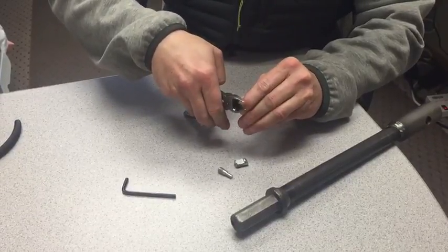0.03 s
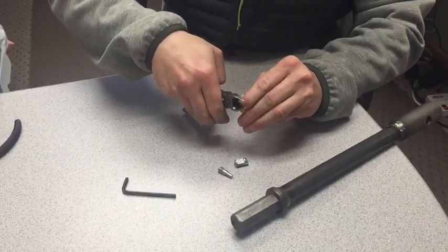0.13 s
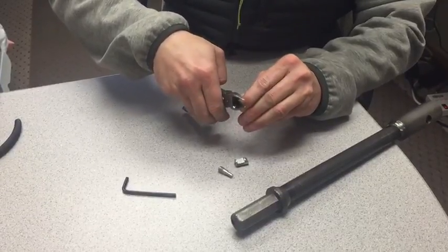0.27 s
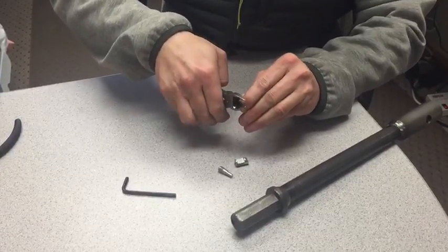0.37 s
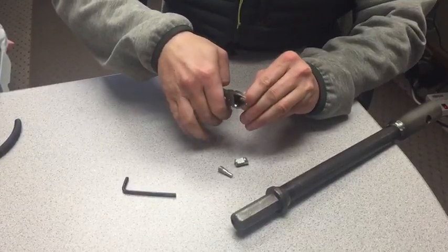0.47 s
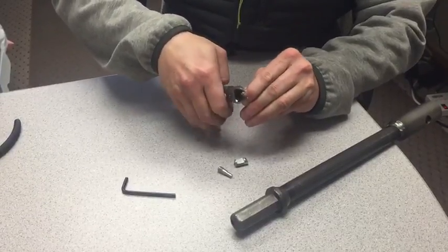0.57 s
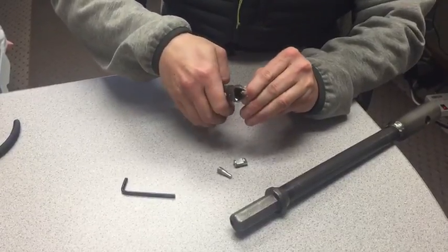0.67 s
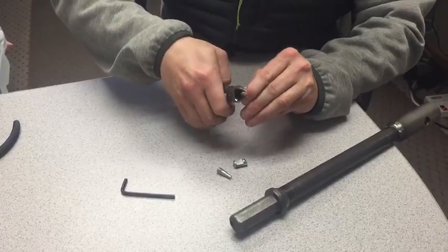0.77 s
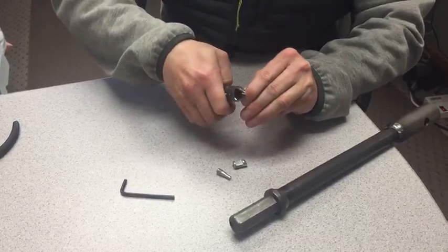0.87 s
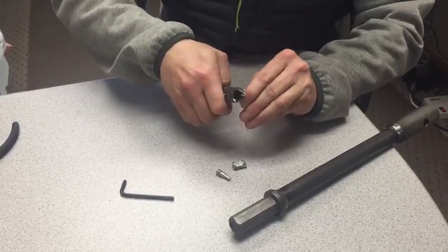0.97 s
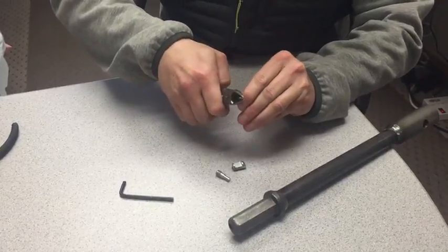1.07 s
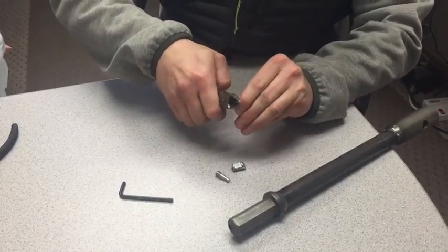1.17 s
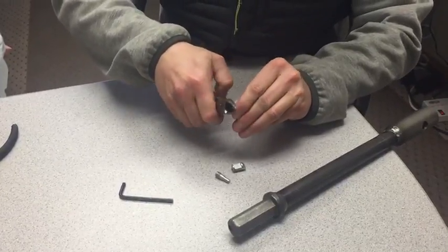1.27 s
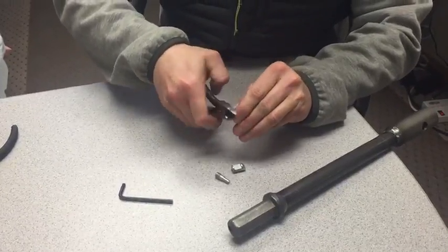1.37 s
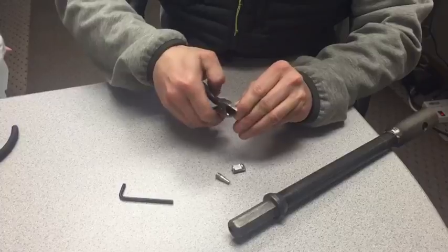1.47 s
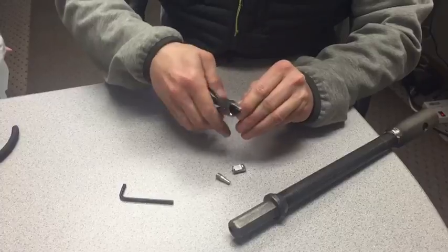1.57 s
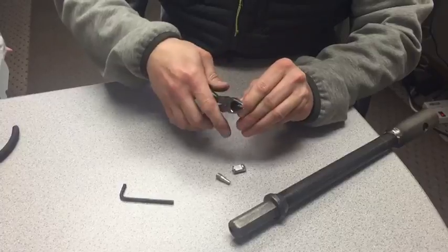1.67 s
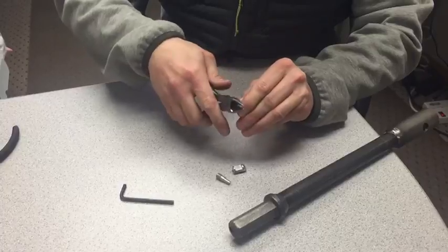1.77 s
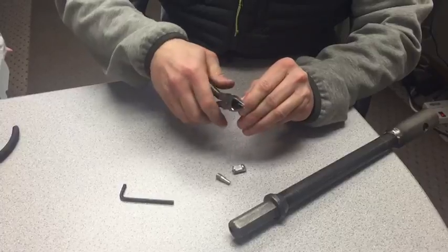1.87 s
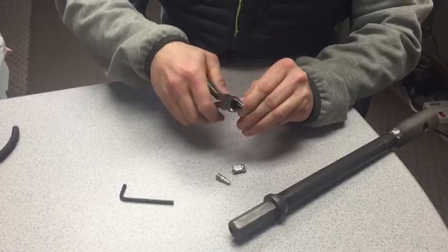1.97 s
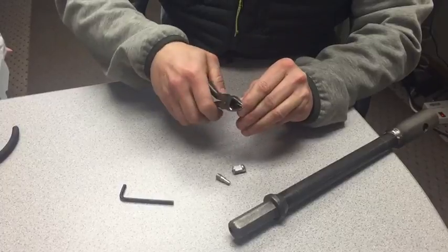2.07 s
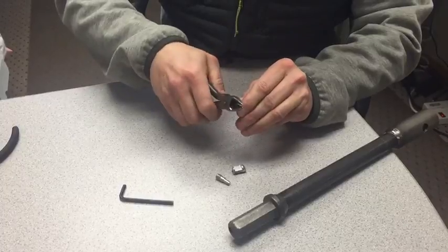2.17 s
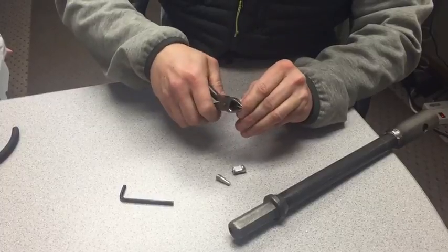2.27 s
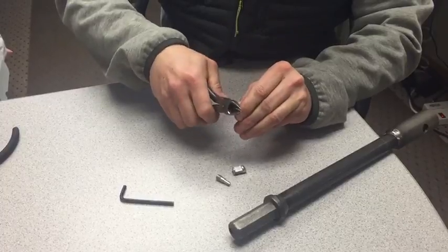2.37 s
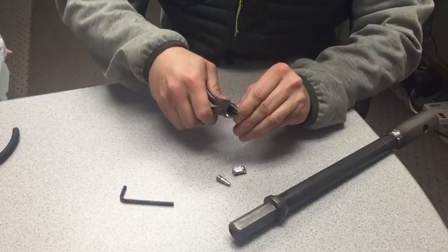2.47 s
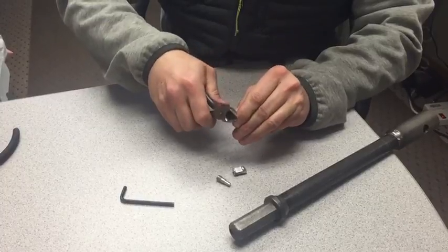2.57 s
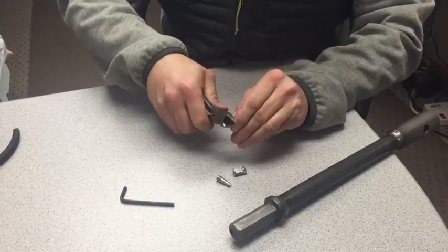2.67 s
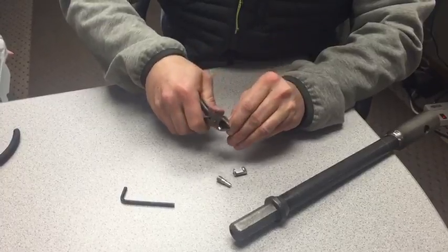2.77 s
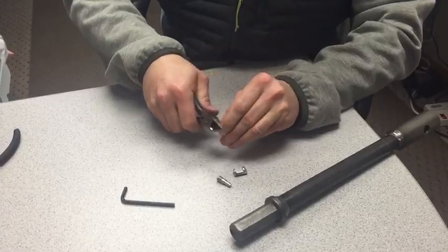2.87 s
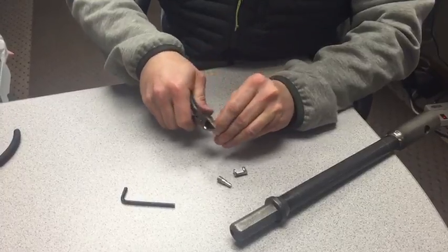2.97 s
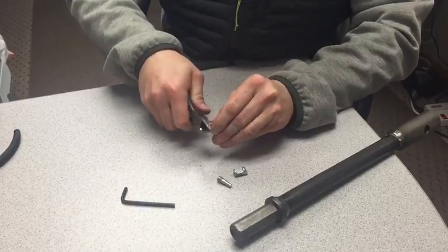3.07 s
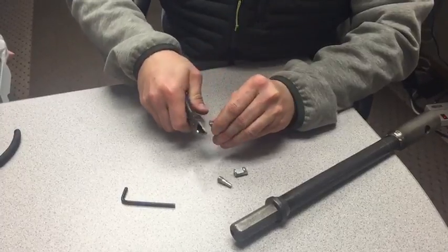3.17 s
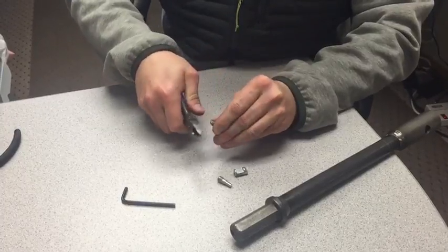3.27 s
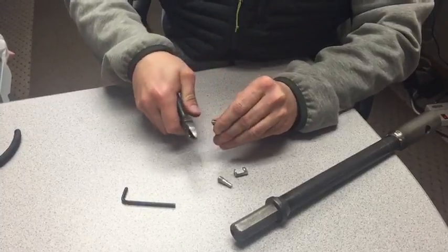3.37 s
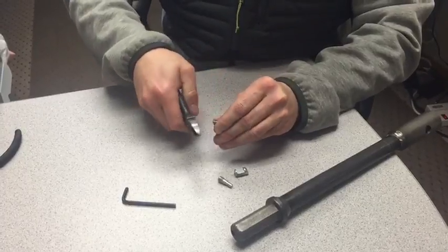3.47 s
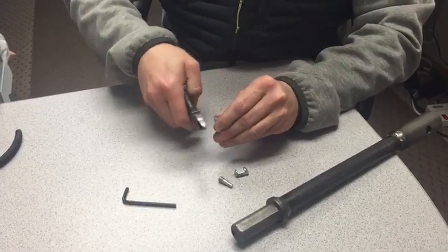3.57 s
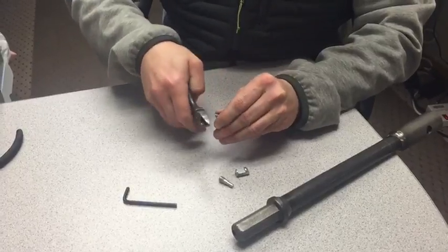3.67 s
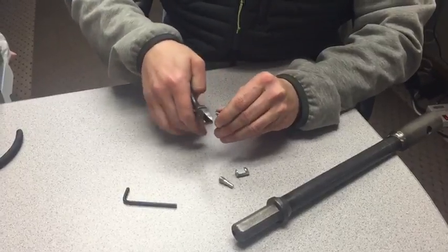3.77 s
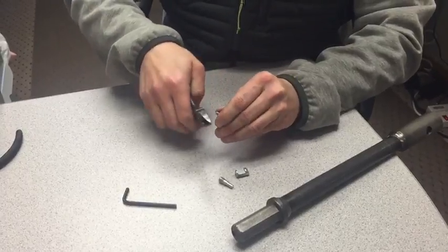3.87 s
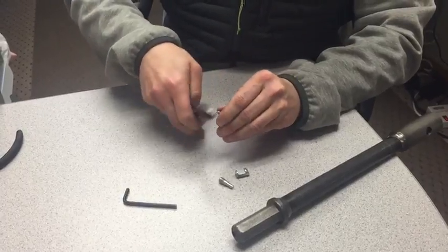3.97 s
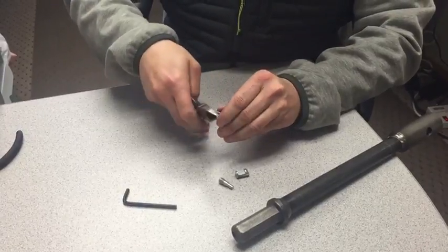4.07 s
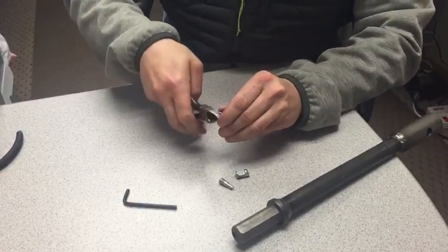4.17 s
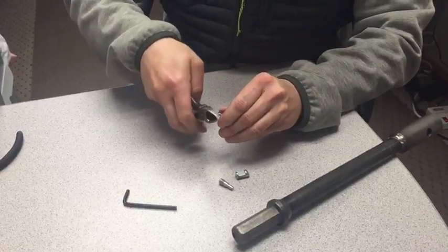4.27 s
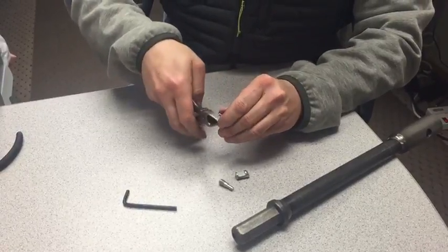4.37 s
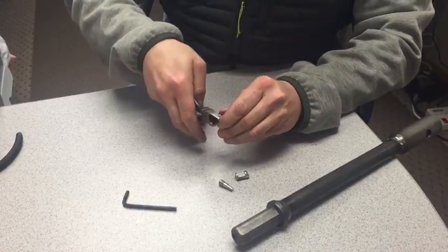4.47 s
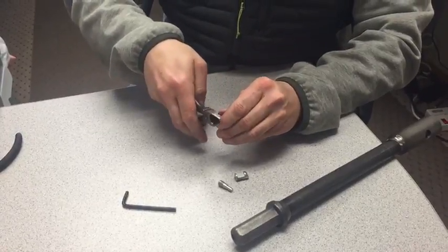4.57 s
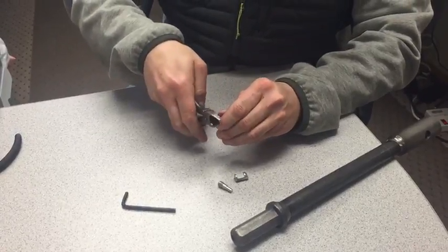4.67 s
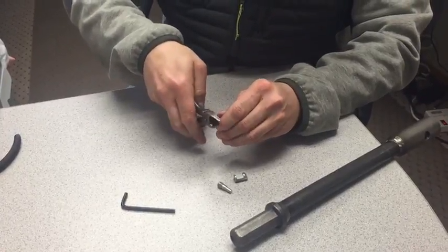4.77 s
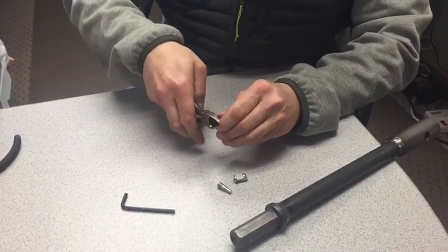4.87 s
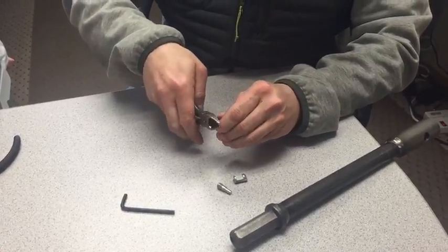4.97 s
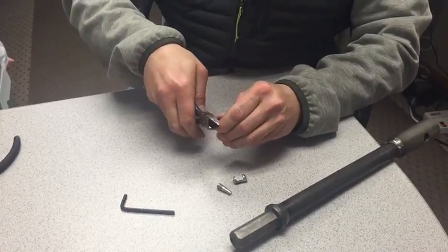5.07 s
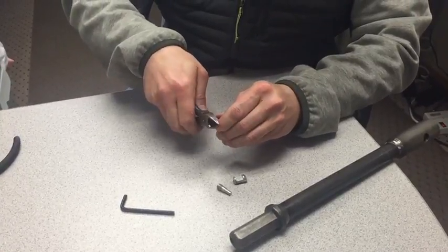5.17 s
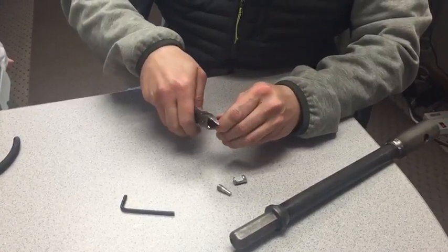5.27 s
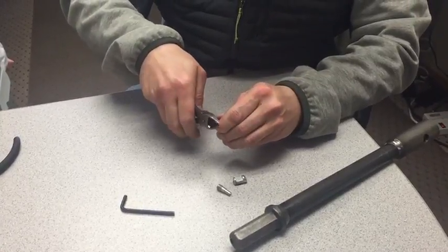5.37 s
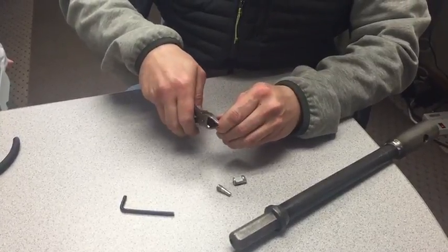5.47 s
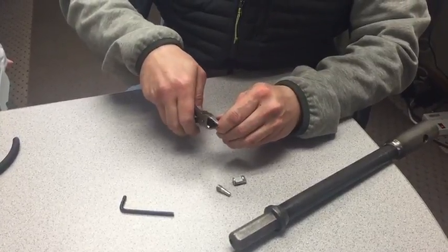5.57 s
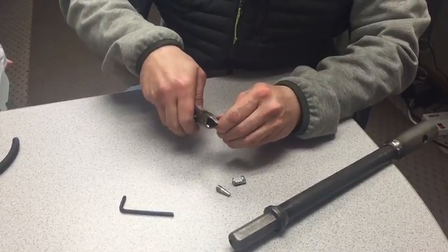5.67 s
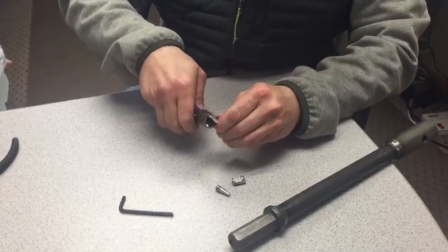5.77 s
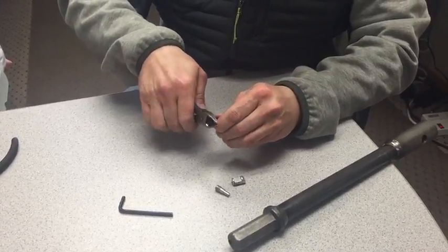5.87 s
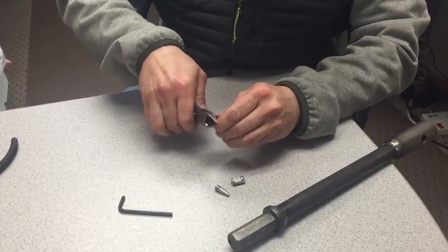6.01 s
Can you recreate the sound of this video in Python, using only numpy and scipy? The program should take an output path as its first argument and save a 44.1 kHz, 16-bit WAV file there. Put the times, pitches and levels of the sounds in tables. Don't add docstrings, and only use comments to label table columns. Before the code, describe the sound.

Close view of a table in a small quiet room with a low ventilation rumble. Cutter handles knock once and the pivot creaks briefly. After a pause, a very loud, bright steel snap jolts the table, and the cut end skips in a far corner. The spring rasps and ticks amid faint sleeve rustle, then the empty jaws clack shut, followed by faint touches and a tap.

```python
import sys
import numpy as np
from scipy import signal
from scipy.fft import rfft, irfft, next_fast_len
from scipy.io import wavfile
from scipy.ndimage import map_coordinates

SR = 44100
rng = np.random.default_rng(int(sys.argv[2]) if len(sys.argv) > 2 else 0)


def ratio_of_db(decibels):
    return 10 ** (np.asarray(decibels, float) / 20)


def to_wav(s):
    ch = np.atleast_2d(s).T
    pcm = np.round(np.clip(ch, -1, 1) * 32767)
    wavfile.write(sys.argv[1], SR, pcm.astype(np.int16))


N = 266408
TAIL = 2 ** 14

# pitch_hz, width_hz, level_db
AIR_MODES = [(51, 11, 2.5), (90.7, 22, -2.5), (109, 27, -6.5), (144, 12, -7), (164.9, 12, 0),
             (195.5, 12, 1)]
# pitch_hz, density_db_per_hz
HISS_COLOUR = [(200, -5.5), (300, -6), (450, -14), (800, -16.5), (4700, -27), (9600, -31.5), (15600, -35),
               (16200, -46)]
# pitch_hz, level_db (rms)
MOTOR_LINES = [(290.7, -88), (387.6, -77), (484.5, -87), (538.3, -91)]

# delay_s, level_db
WALL_ECHOES = [(.0035, -7.5), (.008, -24), (0.0113, -10), (0.015, -16), (.023, -21)]
# pitch_hz, t60_s
ROOM_DECAY = [(150, .2), (600, 0.58), (2000, 0.215), (5000, 0.12), (9000, 0.12), (15000, .125)]

# start_s, peak_db, length_ms
HANDLE_KNOCKS = [
    (.5803, -20, 2.4),
]
PIVOT_SLIPS = [
    (.610, -42, 10),
    (.697, -54, 18),
    (.728, -58, 30),
]
SKIN_GRAZES = [
    (.9188, -58, 2),
    (1.525, -66, 45),
    (4.0765, -52, .8),
    (4.2636, -59, .8),
    (4.2935, -61, .8),
    (4.4346, -60, .8),
    (4.4396, -60, .8),
    (4.4686, -61, .8),
    (4.5154, -62, 1),
]
WIRE_SNAP = [
    (2.9288, -46, 1.9),
    (2.9365, -52, 1.8),
    (2.9405, -50, 1.5),
    (2.9516, 1.2, 1.7),
    (2.9597, -10, 2.6),
    (2.9685, -18, 1.05),
    (2.9715, -17, .8),
]
SLEEVE_RUSTLES = [
    (3.86, -61, 18),
    (4.0768, -52, 1.8),
    (4.12, -64, 34),
    (4.19, -66, 50),
    (4.263, -55, 4),
]
SPRING_TICKS = [
    (4.0017, -33, 1.54),
    (4.012, -36, 1.06),
    (4.0185, -43, 1.5),
]
WIRE_GRAZES = [
    (4.294, -62, .93),
    (4.322, -56.5, .94),
]
JAW_SHUTS = [
    (4.5392, -20, 1.15),
    (4.5465, -40, 1.8),
    (4.5565, -36, 1.8),
    (4.568, -54, 26),
]
RIVET_TAPS = [
    (4.785, -67, 2.7),
    (6.0365, -52, 1.05),
]
HELD_TOUCHES = [
    (5.2228, -40, 1.05),
    (5.231, -50, 1.05),
]
# start_s, peak_db
TABLE_JOLTS = [
    (.582, -47.5),
    (2.9520, -15),
]

# start_s, level_db, length_ms, first_gap_ms, gap_growth, loss_db, length_growth
PIVOT_CREAK = (.638, -51, 8, 6.8, .97, -1.6, .88)
END_LANDING = (3.0812, -28.5, 5, 8, 1.42, 5.3, 1.45)
SPRING_RASP = (3.8065, -45, 2.6, 7.5, 1.12, 2.1, 1.3)

# pitch_hz, width_hz, level_db
HANDLE_MODES = [(340, 83, -20), (650, 80, -5.5), (767, 120, -7), (1040, 120, -10), (1750, 60, -12),
                (2110, 130, 4), (2780, 240, 6), (3160, 250, -8), (4330, 200, 5.5), (5000, 220, -1),
                (5800, 240, -16), (6440, 100, -30), (8300, 1300, -30), (11700, 2500, -45)]
TABLE_MODES = [(71, 47, -0.5), (146.94, 70, 0.5), (260, 127.2, -4.5), (480, 110, -4.5), (728, 250.6, -10)]
JOINT_MODES = [(660, 140, 9), (1010, 220, 3.5), (2090, 110, 8.5), (2700, 240, 2.5), (3100, 400, -4),
               (4550, 320, -2.5), (5830, 660, -14)]
SKIN_MODES = [(700, 600, -9), (2490, 1200, 1), (4150, 410, 3), (5900, 920, -5), (7300, 940, -6)]
BLADE_MODES = [(1350, 500, -23), (1700, 80, -8), (1825, 70, -5), (1950, 90, -1), (2526, 260, -12),
               (3250, 500, -11), (4560, 220, -4), (5800, 700, -10), (7300, 600, -6.5), (8250, 700, -.5),
               (9300, 700, -2), (11100, 600, -7.5), (13200, 1600, -8.5), (15400, 500, -15)]
CORNER_MODES = [(1260, 536, -8.5), (1840, 430, -3), (2450, 290, 4.5), (3200, 740, -1.5), (5495, 1700, -2.5),
                (8380, 3550, -5.5), (14000, 4000, -10.5)]
RUBBED_COIL_MODES = [(2700, 790, -11), (4330, 620, 5), (6000, 670, -11), (6900, 960, 13), (8050, 540, -14),
                     (10500, 1700, -0.5), (13500, 2300, -27)]
SLEEVE_MODES = [(240, 150, 2.5), (600, 550, -1), (1080, 390, -1.5), (1920, 900, -17)]
COIL_MODES = [(1440, 200, -13), (4150, 230, -2), (5790, 520, -3), (7240, 1200, -10), (8720, 420, 1),
              (9440, 400, 1), (12620, 1800, -10.5), (14600, 1200, -17)]
WIRE_TIP_MODES = [(11300, 1500, -5), (14800, 1200, -2)]
OPEN_JAW_MODES = [(338, 45, 9.5), (610, 90, 1.5), (780, 114, -4), (1080, 200, -.5), (2080, 160, 5),
                  (2330, 180, 13), (2550, 200, 7), (3300, 480, 3), (3960, 130, 8), (4500, 600, 10),
                  (5200, 350, 5), (6700, 400, 1.5), (11200, 2200, -5)]
RIVET_MODES = [(300, 180, 0), (1070, 59, 19), (1500, 1500, -9)]
HELD_COIL_MODES = [(1100, 400, -16), (1870, 450, -14), (4140, 400, -15), (5360, 130, 0), (7000, 900, -16),
                   (8660, 300, -1), (9300, 520, -2.5), (13400, 590, -19), (15200, 900, -23)]
# pitch_hz, width_hz, level_db (taken away)
MIC_PORT_NOTCH = [(10400, 200, -2)]


def unit(x):
    return x / np.sqrt(np.mean(x ** 2) + 1e-20)


def along(points, hz):
    f, v = np.transpose(points)
    return np.interp(np.log(hz + 1), np.log(f + 1), v)


def filtered(x, response):
    m = next_fast_len(len(x) + 8192)
    spectrum = rfft(x, m) * response(np.fft.rfftfreq(m, 1 / SR))
    return irfft(spectrum, m)[:len(x)]


def resonances(modes, sign=-1):
    def response(f):
        total = 0
        for k, (centre, width, db) in enumerate(modes):
            damping = 1j * f * width
            total = total + sign ** k * ratio_of_db(db) * damping / (centre * centre - f * f + damping)
        return total
    return response


def padded(body, soft_hz):
    return lambda f: body(f) / (1 - (f / soft_hz) ** 2 + 2.7 * 1j * f / soft_hz)


def wobble(rate):
    knots = rng.standard_normal(int(N * rate / SR) + 4)
    return map_coordinates(knots, [np.arange(N) * rate / SR])


def add(track, s, x):
    part = track[round(s * SR):][:len(x)]
    part += x[:len(part)]


def room_answer(dying):
    hz, t, z = signal.stft(rng.standard_normal(TAIL), SR, nperseg=256)
    decay = ratio_of_db(-60 * dying * t / along(ROOM_DECAY, hz)[:, None])
    tail = signal.istft(z * decay, SR, nperseg=256)[1][:TAIL]
    tail = tail * (1 - np.exp(-np.arange(TAIL) / SR / 0.0017))
    tail = tail / np.linalg.norm(tail)
    for delay_s, db in WALL_ECHOES:
        tail[round(delay_s * SR)] += ratio_of_db(db)
    return tail


def contacts(events, body, dying, room_db):
    out = np.zeros(N)
    ms = 1000 * np.arange(TAIL // 2) / SR
    for s, db, length_ms in events:
        rise_ms = .13 * length_ms ** 1.25
        shape = (1 - np.exp(-ms / rise_ms)) * np.exp(-ms / length_ms)
        force = shape * rng.standard_normal(len(ms))
        for _ in range(3):
            flat = irfft(np.exp(1j * np.angle(rfft(force))), len(ms))
            force = np.sqrt(shape / shape.max()) * flat
        ring = filtered(force, body)
        ring = ratio_of_db(db) * ring / np.abs(ring).max()
        add(out, s, ring)
        add(out, s, ratio_of_db(room_db) * signal.fftconvolve(ring, room_answer(dying)))
    return out


def contact_run(s, db, length_ms, gap_ms, gap_growth, loss_db, length_growth, count):
    k = np.arange(count)
    gaps = gap_ms * gap_growth ** k
    starts = s + (np.cumsum(gaps) - gaps) / 1000
    return np.transpose([starts, db - loss_db * k, length_ms * length_growth ** k])


def ventilation():
    t = np.arange(N) / SR
    modes = resonances(AIR_MODES)
    rumble = filtered(rng.standard_normal(N),
                      lambda f: modes(f) / (1 + (f / 215) ** 6) / (1 + (38 / (f + 1)) ** 4))
    hiss = filtered(rng.standard_normal(N), lambda f: ratio_of_db(along(HISS_COLOUR, f)) * (f > 190))
    hiss = hiss / np.std(filtered(hiss, lambda f: (f > 500) * (f < 5000)))
    hum = np.zeros(N)
    for hz, db in MOTOR_LINES:
        swell = np.sqrt(2) * ratio_of_db(db + 2.9 * wobble(5.8))
        hum += swell * np.sin(2 * np.pi * hz * t + .6 * wobble(14))
    rumble_db = -57.5 + 1.2 * wobble(4)
    hiss_db = -75 + .4 * wobble(1.5)
    return ratio_of_db(rumble_db) * unit(rumble) + ratio_of_db(hiss_db) * hiss + hum


def handle_knock():
    body = padded(resonances(HANDLE_MODES, sign=0.83), soft_hz=6100)
    return contacts(HANDLE_KNOCKS, body, dying=1.05, room_db=-14)


def table_thumps():
    swing = filtered(signal.unit_impulse(TAIL), resonances(TABLE_MODES))
    out = np.zeros(N)
    for s, db in TABLE_JOLTS:
        add(out, s, ratio_of_db(db) * swing / np.abs(swing).max())
    return out


def pivot_creak():
    events = [*PIVOT_SLIPS, *contact_run(*PIVOT_CREAK, count=8)]
    return contacts(events, resonances(JOINT_MODES), dying=2.7, room_db=-11)


def skin_grazes():
    return contacts(SKIN_GRAZES, resonances(SKIN_MODES), dying=0.76, room_db=-11)


def wire_snap():
    return contacts(WIRE_SNAP, resonances(BLADE_MODES), dying=0.8, room_db=-7.2)


def end_landing():
    events = contact_run(*END_LANDING, count=6)
    return contacts(events, resonances(CORNER_MODES), dying=.9, room_db=-1.8)


def spring_rasp():
    events = contact_run(*SPRING_RASP, count=6)
    return contacts(events, resonances(RUBBED_COIL_MODES), dying=0.98, room_db=-2.5)


def sleeve_rustle():
    return contacts(SLEEVE_RUSTLES, resonances(SLEEVE_MODES), dying=1.4, room_db=-9)


def spring_ticks():
    return contacts(SPRING_TICKS, resonances(COIL_MODES), dying=.9, room_db=-8.5)


def wire_grazes():
    return contacts(WIRE_GRAZES, resonances(WIRE_TIP_MODES), dying=1.2, room_db=-5)


def jaw_shuts():
    body = padded(padded(resonances(OPEN_JAW_MODES, sign=1), soft_hz=4500), soft_hz=9000)
    return contacts(JAW_SHUTS, body, dying=1.1, room_db=-12)


def rivet_taps():
    return contacts(RIVET_TAPS, resonances(RIVET_MODES), dying=0.95, room_db=-15)


def held_touches():
    return contacts(HELD_TOUCHES, resonances(HELD_COIL_MODES), dying=0.7, room_db=-9.5)


def scene():
    cutters = handle_knock() + pivot_creak() + wire_snap() + jaw_shuts() + rivet_taps()
    impacts = table_thumps() + end_landing()
    spring = spring_rasp() + spring_ticks() + held_touches()
    hands = skin_grazes() + wire_grazes() + sleeve_rustle()
    return (ventilation() + cutters + impacts + spring + hands)[None]


def roll_off(x):
    return signal.sosfilt(signal.butter(12, 16810, fs=SR, output="sos"), x)


def record(dry):
    port = filtered(dry[0], lambda f: (1j * f) ** 2 / ((1j * f) ** 2 + 1.2 * 1j * f * 42 + 42 ** 2))
    port = port - filtered(port, resonances(MIC_PORT_NOTCH))
    held = port / (1 + np.abs(port / .87) ** 6) ** (1 / 6)
    held = filtered(held, lambda f: 1 / (1 + (f / 15780) ** 160))
    return roll_off(held[None])


dry = scene()
out = record(dry)
to_wav(out)
```